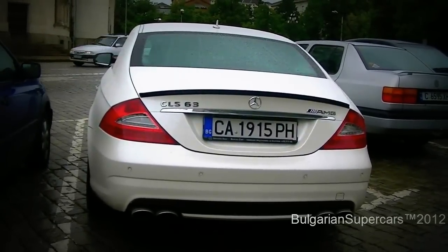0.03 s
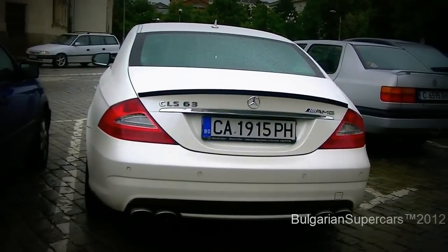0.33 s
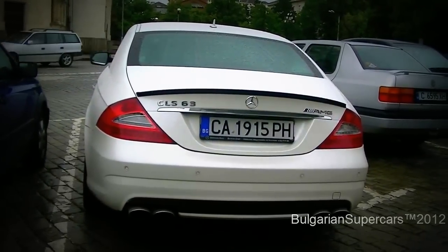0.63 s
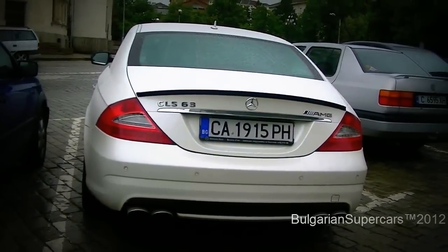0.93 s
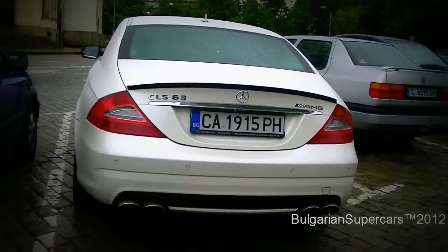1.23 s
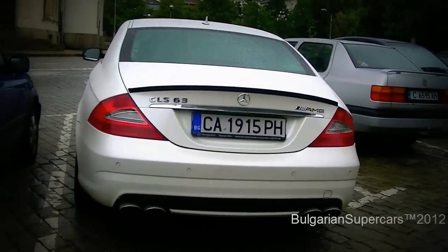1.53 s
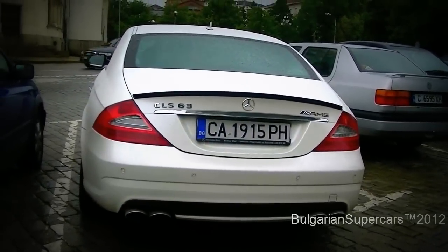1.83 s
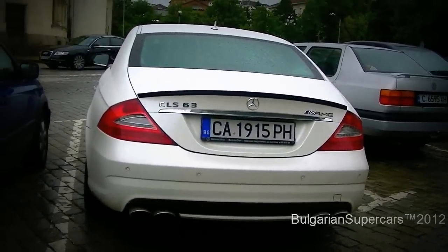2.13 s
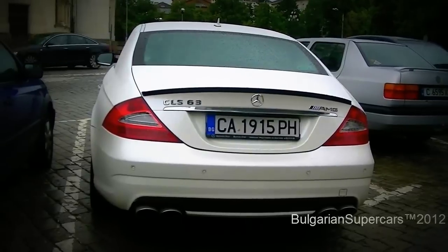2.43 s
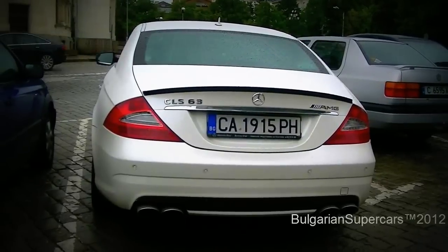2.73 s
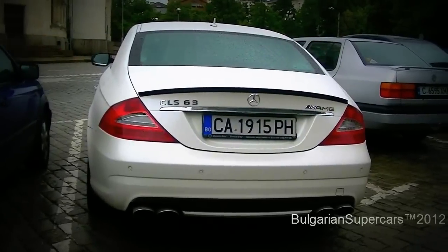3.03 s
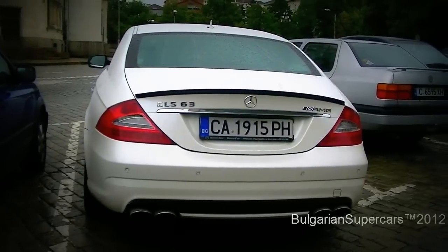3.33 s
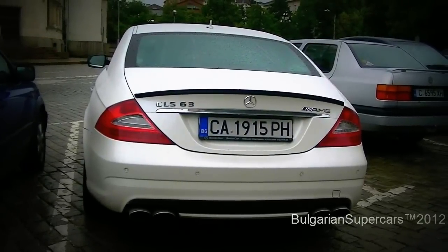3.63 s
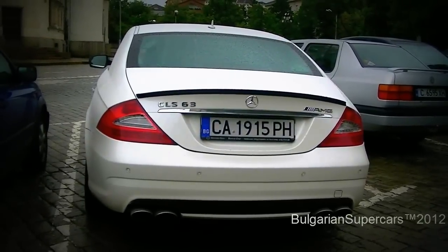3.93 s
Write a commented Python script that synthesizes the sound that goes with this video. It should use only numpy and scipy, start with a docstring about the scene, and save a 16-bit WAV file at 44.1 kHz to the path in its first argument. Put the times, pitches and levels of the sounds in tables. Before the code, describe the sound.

Close to the exhaust of a car parked outdoors, a big engine revs twice, popping sharply after each, sinks toward idle, then revs twice more with a rough boom. Faint fan air and street hiss lie underneath.

```python
"""Parked V8, throttle blips

Heard from just behind the tailpipes, the uneven firing pattern booms in a pipe resonance and rasps
under throttle. Twice the exhaust cracks as the throttle shuts, overloading the microphone.
Cooling fan and street traffic hiss behind it, and parked cars throw back a short reflection."""
import sys
import numpy as np
from scipy import signal
from scipy.fft import rfft, irfft, next_fast_len
from scipy.io import wavfile
from scipy.ndimage import map_coordinates

SR = 44100
rng = np.random.default_rng(int(sys.argv[2]) if len(sys.argv) > 2 else 0)


def unload_wav(signal):
    """Save mono or channel-first audio to the path in sys.argv[1] as 16-bit WAV at rate SR, clipped to [-1, 1]."""
    wavfile.write(
        sys.argv[1],
        SR,
        np.round(np.clip(np.atleast_2d(signal).T, -1, 1) * 32767).astype(np.int16),
    )


N = 176400

# engine speed: time_s, firing_hz
REVS = [(0.0, 237), (0.457, 151), (0.498, 158.6), (0.572, 196), (0.653, 217), (0.752, 231), (0.801, 237),
        (0.859, 217), (1.309, 154), (1.337, 141), (1.426, 191), (1.509, 226), (1.612, 255), (1.704, 231),
        (1.758, 234), (2.217, 145), (2.505, 92), (2.576, 71.6), (2.631, 73), (2.793, 131.5), (2.985, 220),
        (3.06, 231), (3.146, 222), (3.343, 174), (3.425, 192.6), (3.6, 279), (3.695, 302.0), (3.768, 300),
        (4.0, 252)]
# throttle blips: open_s, shut_s, rasp_db, ragged_db, hardest_firing_s
THROTTLE_BLIPS = [(0.467, 0.819, -25.5, -15, .678), (1.334, 1.693, -25, -7, 1.606),
                  (2.669, 3.096, -31.5, -5, 3.03), (3.365, 3.683, -27.5, -4.5, 3.473),
                  (3.823, 4.048, -42, -40, 3.879)]
# fader ride of the firing note: time_s, level_db
NOTE_RIDE = [(0, -40), (.2, -31), (.4, -23.5), (.48, -18.5), (.6, -21), (.77, -21.5), (.86, -38.5),
             (1.05, -33), (1.32, -17), (1.52, -22), (1.63, -16.5), (1.7, -29), (1.76, -39), (2, -28),
             (2.28, -15.5), (2.41, -18), (2.53, -33), (2.62, -47), (2.69, -19.5), (2.78, -16), (2.9, -20.5),
             (3.06, -24), (3.14, -32), (3.33, -24.5), (3.4, -18.5), (3.55, -18), (3.65, -14.5),
             (3.73, -21.5), (3.84, -13.5), (4, -17.5)]
# fader ride of the pipe boom: time_s, level_db
BOOM_RIDE = [(0, -26.5), (.21, -28), (.29, -19.5), (.36, -23), (.45, -17.5), (.49, -10.5), (.6, -10.5),
             (.68, -12.5), (.79, -13.5), (.85, -29), (1.03, -28), (1.11, -21), (1.18, -25.5), (1.3, -14),
             (1.35, -13.5), (1.44, -10), (1.5, -12.5), (1.67, -13.5), (1.74, -27), (1.9, -28), (2.05, -22),
             (2.17, -18.5), (2.47, -19.5), (2.55, -15), (2.6, -21), (2.66, -20.5), (2.69, -11), (2.9, -13),
             (3.06, -15), (3.13, -24), (3.27, -23), (3.33, -15.5), (3.38, -9.5), (3.52, -11.5), (3.66, -16),
             (3.73, -27), (3.8, -19), (3.86, -15.5), (4, -15)]
# partials of the uneven four-stroke cycle: cycle_multiple, coasting_db, throttle_db
ENGINE_ORDERS = [(3, 3, -5), (4, 15, 8), (5, 19.5, 18), (6, 16, 9), (7, 10, 2), (9, 13, 8.5),
                 (10, 12.5, 16), (11, 14, 9), (12, -2, 10), (13, 17, 16), (14, 6, 6.5), (15, 3.5, 8.5),
                 (16, 14.5, 17), (18, 5.5, 10), (19, 7, 12), (21, 8.5, 12.5), (22, -13, 9), (24, 11, 14),
                 (27, 7.5, -5), (32, 6, 5.5)]
# tailpipe resonance: freq_hz, gain_db
PIPE_EQ = [(25, -72), (60, -33), (100, -31.5), (130, -14.5), (170, -11.5), (220, -13), (270, -6),
           (295, 1.5), (315, 3.5), (335, -2.5), (365, -4), (410, -12), (480, -24), (600, -22.5),
           (750, -17.5), (1100, -42.5), (2500, -68)]
# heavy single firings: start_s, level_db
HEAVY_FIRINGS = [(0.556, -8), (0.674, 2.5), (1.324, 4), (1.436, 7.5), (2.509, 1.5), (2.555, -9),
                 (2.67, 2.5), (2.719, 0.5), (2.93, 8)]
# tone of the gas puffs: freq_hz, gain_db
RASP_EQ = [(40, -64), (200, -31), (450, 3), (520, -10.5), (580, 9), (690, -4), (750, 11), (900, 0.5),
           (1060, 5), (1150, 2.5), (1250, 6.5), (1340, -12.5), (1600, 1.5), (1850, -18), (2150, -3),
           (2800, -21.5), (4500, -16.5), (7000, -65), (14000, -69)]
# hard accents in the rasp: start_s, level_db
RASP_BARKS = [(.666, -17.5), (.725, -17.5), (0.742, -17.5), (0.773, -25), (1.374, -25), (1.483, -21),
              (1.614, -14), (2.922, -17), (2.932, -17), (2.972, -21.5), (3.074, -27.5), (3.463, -21),
              (3.552, -17.5), (3.595, -22)]
# ring of the tailpipe tips: pitch_hz, level_db, t60_s
TIP_MODES = [(750, -14, 0.082), (1056, 1.5, 0.085), (1229, -1, 0.1), (1560, -8, 0.074), (2080, 4, 0.017),
             (2174, 3, 0.019), (3350, -6.5, 0.018), (4343, -4, 0.032)]
# exhaust cracks: start_s, crack_db, crack_t60_s, bang_db
BACKFIRES = [(0.8061, -5.5, 0.019, -15), (1.6939, -7.5, 0.011, -25.5)]
# tone of the cracks, one list each: freq_hz, gain_db
CRACK_EQS = [
    [(40, -28), (400, 6.5), (1200, 6), (2300, -6), (3400, -23), (4900, -14), (5600, -4), (6400, -1),
     (8700, 1.5), (9600, -8), (10500, -1), (12000, -14), (14000, -8.5)],
    [(60, -25), (750, 5.5), (1080, 6.5), (1700, -15), (2250, 1.5), (3400, -18), (4700, 0), (5600, -17),
     (6500, 2.5), (7700, 0), (9200, -15), (11000, -9), (14000, -14)],
]
# dull body under a crack: freq_hz, gain_db
BANG_EQ = [(40, -28), (130, -5), (300, 3.5), (500, 1.5), (800, -7), (1250, -3), (1700, -9), (2300, -3),
           (3300, -14), (8000, -18), (14000, -25)]
# small exhaust spits: start_s, level_db
FUEL_SPITS = [(0.466, -32), (.774, -42), (.79, -37), (1.324, -31.5), (1.599, -35), (2.48, -29.5),
              (3.568, -35), (3.625, -35)]
# decay among the parked cars: freq_hz, t60_s
LOT_DECAY = [(150, 0.47), (2000, 0.14), (12000, 0.042)]
# fader ride of the fan and intake air: time_s, level_db
FAN_RIDE = [(0, -38.5), (.15, -37.5), (.45, -33), (.75, -25), (.9, -40), (1.3, -33), (1.65, -27.5),
            (1.78, -40), (2, -36), (2.2, -31), (2.5, -28), (2.6, -24.5), (2.66, -22), (2.69, -28.5),
            (2.82, -32.5), (3.16, -35.5), (3.35, -32), (3.7, -27.5), (3.75, -31), (3.85, -28.5), (4, -31)]
# tone of that air: freq_hz, gain_db
FAN_EQ = [(30, -19.5), (120, 10.5), (300, -1), (520, 0.5), (800, 2.5), (1200, -1.5), (1700, -7), (2300, -8),
          (3200, -15.5), (5000, -27.5), (12000, -31.5)]
# fader ride of the street hiss: time_s, level_db
STREET_RIDE = [(0, -48), (.15, -51.5), (.45, -45), (.75, -43.5), (.86, -48.5), (1.02, -52), (1.3, -44),
               (1.65, -42.5), (1.76, -51), (1.92, -49.5), (2.46, -40), (2.54, -43), (2.665, -38),
               (2.72, -45.5), (2.82, -48), (2.93, -44.5), (3.12, -47.5), (3.6, -42.5), (3.74, -45),
               (4, -40.5)]
# bright hiss of street and spits: freq_hz, gain_db
HISS_EQ = [(300, -32), (2000, -7), (4500, 2), (7000, -2), (10000, -5), (12000, -10.5), (14000, -19)]

CYLINDERS = 8
COOL_SHIFT = 0.024  # cooler gas lowers the pipe resonance by this share when coasting
CHUG_DEPTH, CHUG_MERGE_HZ = 0.44, 123  # swell on each firing; speed above which the swells merge
RASP_REF_HZ, RASP_DB_PER_OCT = 257, 8  # the rasp grows with engine speed


def pipe_boom(firing_hz, firings, waver, drift_rad, spread_rad, trim_db):
    """Each engine order swells as it crosses the pipe resonance, lumpy under throttle."""
    boom, power = np.zeros(N), np.zeros(N)
    blips = [(throttle(start, shut), firings[int(hardest_s * SR)])
             for start, shut, _, _, hardest_s in THROTTLE_BLIPS]
    load = sum(pedal for pedal, _ in blips)
    cooling = 1 + COOL_SHIFT * (1 - load)
    for order, coasting_db, throttle_db in ENGINE_ORDERS:
        ratio = order / CYLINDERS
        pipe_db = along(PIPE_EQ, ratio * firing_hz * cooling)
        gain = amp(coasting_db + load * (throttle_db - coasting_db) + pipe_db)
        # overtones of the firing note stay in step with it, so slow firings beat separately
        coasting = (1 - load) * np.exp(2j * np.pi * rng.random() * (ratio % 1 > 0))
        # under throttle the orders line up on the hardest cylinder: one lump a cycle
        pulling = sum(pedal * np.exp(1j * (spread_rad * rng.normal() - 2 * np.pi * ratio * hardest))
                      for pedal, hardest in blips)
        partial = np.exp(1j * (2 * np.pi * ratio * firings + drift_rad * wobble(9.7)))
        boom += gain * (1 + waver * wobble(21.88)) * np.real((coasting + pulling) * partial)
        power += gain ** 2 / 2
    chug = 1 + CHUG_DEPTH * load * np.cos(2 * np.pi * firings) / (1 + (firing_hz / CHUG_MERGE_HZ) ** 2) ** 2
    return amp(curve(BOOM_RIDE) + trim_db) * chug * boom / np.sqrt(power)


def firing_note(firings, waver):
    """The engine's pitch: a wavering sine, one period a firing."""
    level = amp(curve(NOTE_RIDE)) * (1 + waver * wobble(32.05))
    return level * np.sqrt(2) * np.sin(2 * np.pi * firings)


def ragged_boom(firings, coasting_db):
    """No two firings are equally strong; their scatter rings the pipe, more so under throttle."""
    count = firings.astype(int)
    pulses = np.diff(count, prepend=0) * rng.standard_normal(4096)[count]
    pulling = sum(amp(db) * throttle(start, shut) for start, shut, _, db, _ in THROTTLE_BLIPS)
    share = amp(coasting_db) + pulling / 2
    return unit(coloured(pulses, PIPE_EQ)) * share * amp(curve(BOOM_RIDE))


def thumps(ring_hz, rise_s, t60_s):
    """Each heavy firing rings the pipe's main resonance once."""
    hits = np.zeros(N)
    for start, db in HEAVY_FIRINGS:
        age = np.arange(N) / SR - start
        attack = 1 - np.exp(-np.maximum(age, 0) / rise_s)
        hits += amp(db) * attack * burst(start, t60_s) * np.sin(2 * np.pi * ring_hz * age)
    return hits


def rasp(firing_hz, firings, puff_scatter_db, snap_scatter_db, repeat_db, bite_db):
    """Under throttle each firing blows a puff of gas and snaps in the pipe tips; a few bark."""
    count = firings.astype(int)
    puff_chance, snap_chance = rng.uniform(-1, 1, (2, 4096))[:, count]
    # part of the flow repeats every engine cycle, the rest is turbulence
    cycle = firings / CYLINDERS % 1
    pattern = map_coordinates(rng.standard_normal(1024), [cycle * 1024], mode="wrap")
    flow = rng.standard_normal(N) + amp(repeat_db) * pattern
    puffs = amp(puff_scatter_db * puff_chance) * np.exp(-2.2 * (firings % 1))
    clicks = np.diff(count, prepend=0) * amp(snap_scatter_db * snap_chance)
    snaps = signal.fftconvolve(clicks, burst(0, t60_s=0.003))[:N]
    gas = unit(coloured(puffs * flow, RASP_EQ)) + amp(bite_db) * tip_ring(snaps * flow)
    gate = sum(amp(db) * throttle(start, shut) for start, shut, db, _, _ in THROTTLE_BLIPS)
    rev_gain = amp(RASP_DB_PER_OCT * np.log2(firing_hz / RASP_REF_HZ))
    barks = sum(amp(db) * burst(start, t60_s=0.036) for start, db in RASP_BARKS)
    return np.hypot(gate * rev_gain, barks) * gas


def tip_ring(snaps):
    """Snaps of gas ring the tailpipe tips; rms 1."""
    t = np.arange(SR // 10) / SR
    ring = sum(amp(db) * np.exp(-np.log(1000) * t / t60) * np.cos(2 * np.pi * hz * t)
               for hz, db, t60 in TIP_MODES)
    return unit(signal.fftconvolve(snaps, ring)[:N])


def backfires():
    """Unburnt fuel goes off in the pipe: a bright crack over a duller bang, or only a spit."""
    cracks = sum(amp(db) * burst(start, t60, hold_s=0.0033) * noise(eq)
                 for (start, db, t60, _), eq in zip(BACKFIRES, CRACK_EQS))
    bangs = sum(amp(db) * burst(start, t60_s=0.14) for start, _, _, db in BACKFIRES)
    spits = sum(amp(db) * burst(start, t60_s=0.07) for start, db in FUEL_SPITS)
    return cracks + bangs * noise(BANG_EQ) + spits * noise(HISS_EQ)


def lot_reflections(x):
    """Parked cars and paving scatter a short tail whose treble dies first."""
    hz, t, spectrum = signal.stft(rng.standard_normal(SR // 3), SR, nperseg=256)
    decay = np.exp(-np.log(1000) * t / along(LOT_DECAY, hz)[:, None])
    tail = signal.istft(spectrum * decay, SR, nperseg=256)[1]
    predelayed = np.pad(x, (200, 0))
    return signal.fftconvolve(predelayed, tail / np.linalg.norm(tail))[:N]


def fan(trim_db, waver_db):
    """Air rushes through the cooling fan and intake with a slight flutter."""
    return amp(curve(FAN_RIDE) + trim_db + waver_db * wobble(29.51)) * noise(FAN_EQ)


def street():
    """A bed of traffic hiss that dips and creeps back."""
    return amp(curve(STREET_RIDE)) * noise(HISS_EQ)


def throttle(open_s, shut_s, travel_s=0.0067):
    """A ramped gate: 1 while the pedal is down, else 0."""
    t = np.arange(N) / SR
    return np.clip(np.minimum(t - open_s, shut_s - t) / travel_s + 0.5, 0, 1)


def burst(start_s, t60_s, hold_s=0):
    """Instant attack, hold, exponential decay."""
    age = np.arange(N) / SR - start_s
    return (age >= 0) * np.exp(-np.log(1000) * np.maximum(age - hold_s, 0) / t60_s)


def amp(db):
    """Decibels to gain."""
    return 10 ** (np.asarray(db) / 20)


def unit(x):
    """Scale to rms 1."""
    return x / np.sqrt(np.mean(x ** 2) + 1e-20)


def along(points, hz):
    """Read (freq_hz, value) points on a log frequency axis."""
    freqs, values = np.transpose(points)
    return np.interp(np.log(hz + 1), np.log(freqs + 1), values)


def curve(points):
    """Join (time_s, value) points, one value a sample."""
    return np.interp(np.arange(N) / SR, *np.transpose(points))


def wobble(rate_hz):
    """Smooth random modulation, rate_hz knots a second."""
    return map_coordinates(rng.standard_normal(2048), [np.arange(N) * rate_hz / SR + 2], mode="wrap")


def coloured(x, eq):
    """x through a minimum-phase EQ of unit power gain."""
    size = 2 * next_fast_len(N // 2 + 8192)
    gain = amp(along(eq, np.fft.rfftfreq(size, 1 / SR)))
    cepstrum = irfft(np.log(unit(gain) + 1e-6), size)
    cepstrum[1:size // 2] *= 2
    cepstrum[size // 2 + 1:] = 0
    return irfft(rfft(x, size) * np.exp(rfft(cepstrum)), size)[:N]


def noise(eq):
    """Coloured noise of rms 1."""
    return unit(coloured(rng.standard_normal(N), eq))


def scene():
    """Mono mix: dry low end, sharp layers with reflections, fan and street behind."""
    firing_hz = curve(REVS)
    firings = np.cumsum(firing_hz) / SR
    sharp = backfires()
    sharp += rasp(firing_hz, firings, puff_scatter_db=5.5, snap_scatter_db=9.5, repeat_db=-3.5, bite_db=-6)
    low = pipe_boom(firing_hz, firings, waver=0.26, drift_rad=0.5, spread_rad=0.75, trim_db=-0.5)
    low += firing_note(firings, waver=0.17)
    low += ragged_boom(firings, coasting_db=-13)
    low += thumps(ring_hz=320, rise_s=0.003, t60_s=0.055)
    reflections = amp(-17.5) * lot_reflections(sharp)
    return (low + sharp + reflections + fan(trim_db=1.5, waver_db=1.1) + street())[None]


def record(dry):
    """The microphone soft-clips the peaks and keeps nothing above its band limit."""
    ceiling, top_hz = 1.05, 14300
    clipped = dry / (1 + np.abs(dry / ceiling) ** 8) ** (1 / 8)
    size = next_fast_len(N + 8192)
    passband = np.fft.rfftfreq(size, 1 / SR) < top_hz
    return irfft(rfft(clipped, size) * passband, size)[..., :N]


dry = scene()
out = record(dry)
unload_wav(out)
```